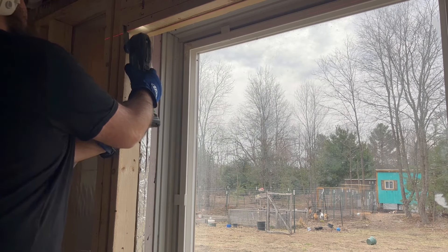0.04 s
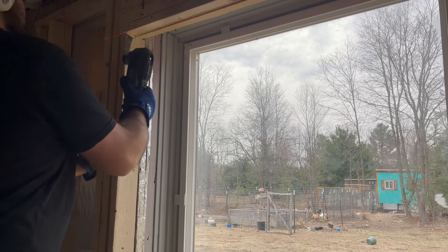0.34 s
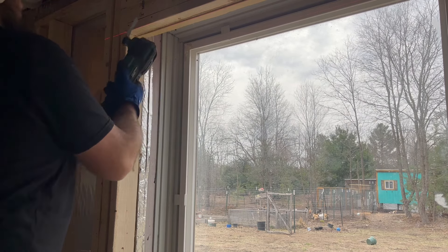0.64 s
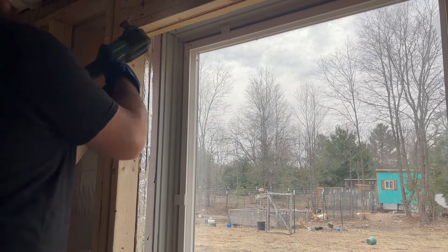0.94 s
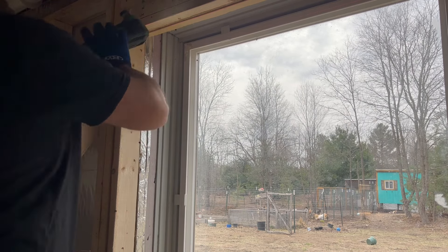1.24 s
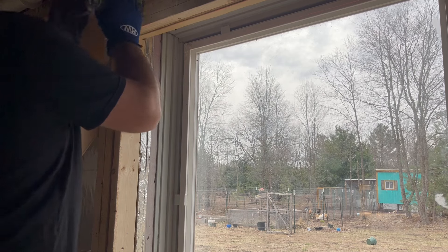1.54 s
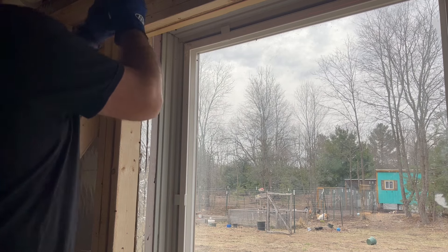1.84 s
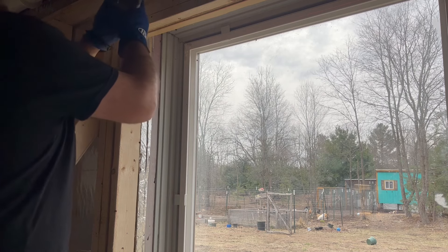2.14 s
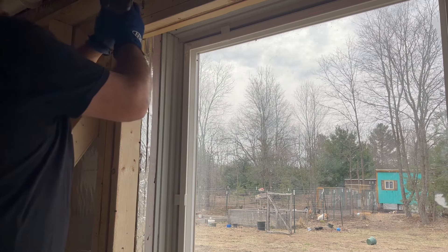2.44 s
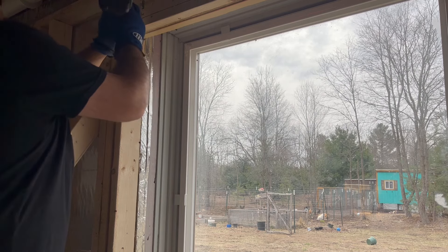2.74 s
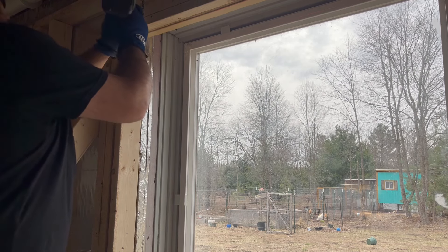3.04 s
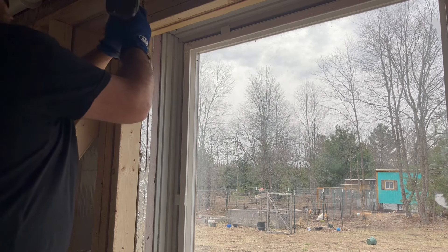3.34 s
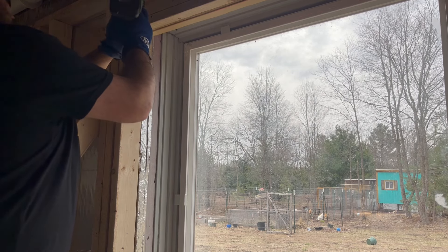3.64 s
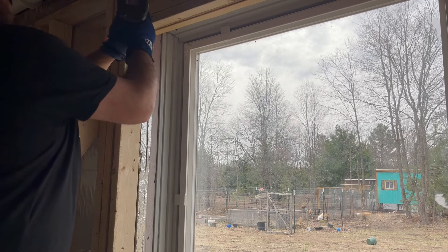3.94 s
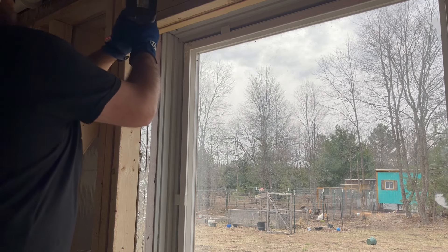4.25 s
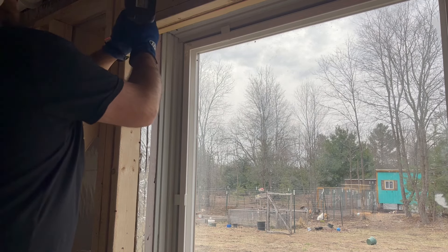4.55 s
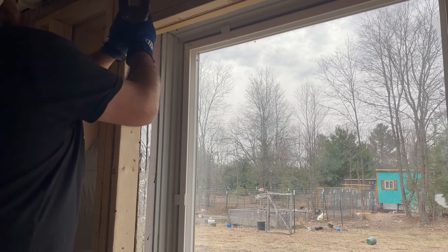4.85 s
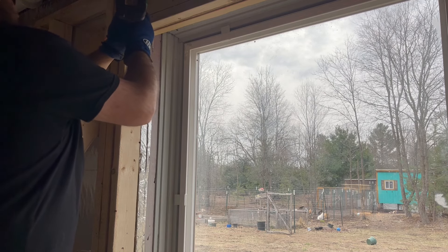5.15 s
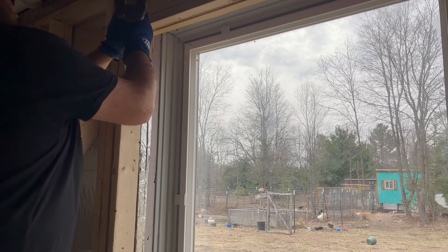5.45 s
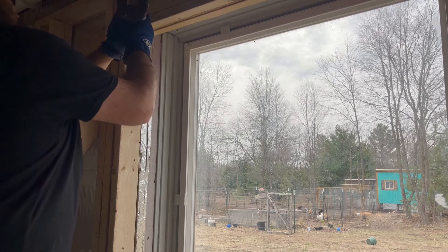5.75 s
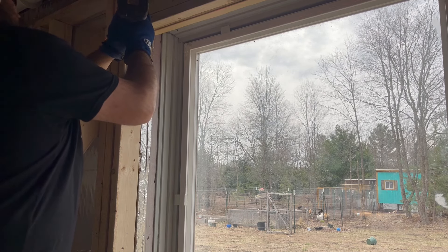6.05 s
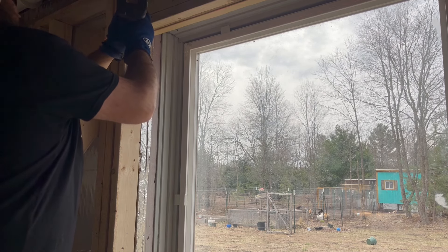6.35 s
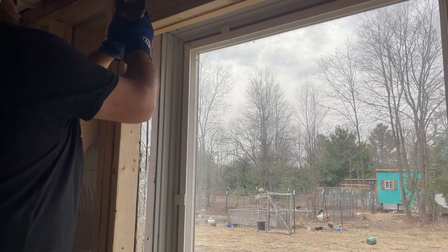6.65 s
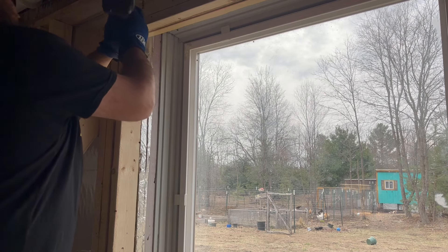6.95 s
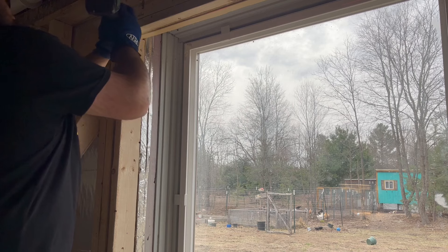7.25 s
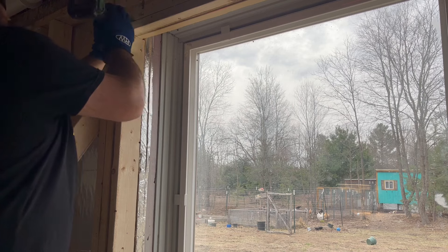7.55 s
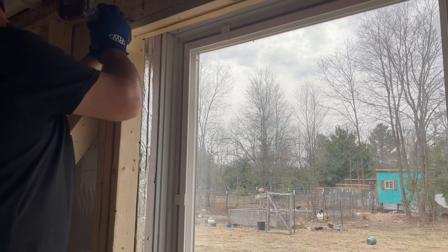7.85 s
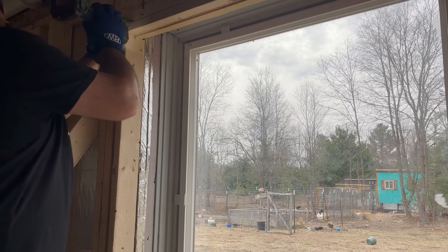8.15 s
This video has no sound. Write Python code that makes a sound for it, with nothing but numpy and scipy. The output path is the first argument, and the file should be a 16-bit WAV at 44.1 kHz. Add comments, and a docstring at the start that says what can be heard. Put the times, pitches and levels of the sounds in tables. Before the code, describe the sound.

A cordless oscillating tool buzzes steadily, then grows louder and raspier as its blade cuts into a wooden beam.

```python
"""An unfinished room, where a cordless oscillating tool works on a wooden beam overhead.
The blade swings about 300 times a second: after a brief bite it runs almost free, then cuts, then
wedges in the kerf. Its strokes kick housing, beam and blade into a harmonic buzz that roughens under
load. The teeth rasp, the blade rubs the kerf and now and then knocks on the timber, the timber frame
shudders, and the tool's fan hisses underneath."""
import sys
import numpy as np
from scipy import signal
from scipy.fft import rfft, irfft
from scipy.io import wavfile

SR = 44100
rng = np.random.default_rng(int(sys.argv[2]) if len(sys.argv) > 2 else 0)


def bounce(signal):
    """Save signal as a 16-bit WAV file at the path given by the first command-line argument."""
    frames = np.transpose(np.atleast_2d(signal))
    limited = np.clip(frames, -1, 1)
    pcm = np.round(limited * 32767).astype(np.int16)
    wavfile.write(sys.argv[1], SR, pcm)


N = 370440
TIME = np.arange(N) / SR
SLOW_TIME = np.linspace(0, N / SR, N // 60)   # control grid for the envelopes
STROKE_HZ = 301.3   # the rate that the governor aims at


# housing hum on harmonic 1, riding up and down as the tool turns in the hands: (time [s], level [dB])
HOUSING_HUM = [(0.0, -51), (0.04, -50), (0.16, -61), (0.18, -55), (1.26, -60), (1.38, -70), (1.4, -64.5),
               (1.73, -59), (3.86, -54), (4.16, -54.5), (4.23, -50), (4.37, -58), (4.6, -59), (4.77, -63),
               (4.84, -52.5), (6.15, -53.5), (6.2, -55), (6.36, -50), (6.53, -52), (7.27, -49.5),
               (7.34, -53.5), (7.95, -57), (8.05, -53), (8.09, -52), (8.14, -66), (8.16, -62), (8.19, -48),
               (8.24, -81), (8.26, -49), (8.28, -50), (8.4, -54)]
# low drone on harmonics 2 and 3: (time [s], level [dB])
LOW_DRONE = [(0, -52), (.15, -65.5), (.33, -76.5), (1.5, -72), (2.3, -63.5), (3.68, -61), (3.9, -68.5),
             (4.06, -50), (4.17, -49), (4.25, -67), (4.35, -50.5), (4.7, -56), (4.85, -59.5), (5.3, -62),
             (5.65, -50.5), (6.08, -53), (6.24, -44.5), (6.5, -49), (6.8, -47.5), (7.17, -49.5), (7.3, -59),
             (7.52, -58.5), (7.6, -49.5), (7.7, -56.5), (8.05, -57), (8.4, -50.5)]
# ring near 1.5 kHz on harmonic 5: (time [s], level [dB])
MID_RING = [(0.25, -73), (.8, -76), (1.45, -77), (2.05, -69.5), (3.9, -71.5), (4.13, -56), (4.2, -67),
            (4.33, -55), (4.72, -54), (4.77, -64.5), (5.86, -81), (5.95, -54), (6.02, -74), (6.09, -56),
            (6.27, -86), (6.33, -46), (6.42, -59), (6.55, -68), (6.62, -47), (6.75, -62), (6.84, -48),
            (6.97, -47), (7.06, -40.5), (7.14, -38.5), (7.2, -42), (7.27, -56), (7.37, -52.5), (7.68, -53),
            (7.76, -47.5), (7.92, -53.5), (7.99, -68), (8.15, -50.5), (8.24, -58), (8.31, -45),
            (8.4, -41.5)]
# base mix as the wood grips the blade: (grip [0 free, 1 cutting, 2 wedged], beam bark [dB],
# blade buzz [dB], blade sizzle [dB], teeth rasp [dB], kerf scrape [dB], frame shudder [dB])
GRIP_MIX = [(0, -68, -67.5, -64, -68.5, -71, -101), (.3, -69, -67.5, -69.5, -72, -69.5, -89),
            (.6, -60.5, -60.5, -64, -57.5, -56, -85), (1, -55, -52.5, -59, -53, -59, -72.5),
            (1.3, -49, -46, -53.5, -55, -52.5, -61), (2, -39.5, -44.5, -43, -36, -49, -90)]
# stereo image from the room's standing waves: (frequency [Hz], left over right [dB], left lead [rad])
STANDING_WAVES = [(301, 2, .1), (602, 4.3, .75), (904, 0, .9), (1205, -1, -.4), (1506, -.8, -1.85),
                  (1807, 1, .2), (2110, 2.5, .3), (4200, 2.5, .2), (6600, .5, 0), (15000, -.5, 0)]

def stroke_buzz(angle, grip, swell_db=1.15, top_trim_db=-.4, top_loss_db=5, scatter_rad=2.54):
    """Each stroke kicks housing, beam and blade: a stack of clean harmonics that roughen under load."""
    order = np.arange(1, 50)
    hz = order * STROKE_HZ
    gain = buzz_timbre(order, grip)
    pan_db, lead = read(STANDING_WAVES, hz)
    lead = lead + at_hz(PORT_LEAD, hz)
    hum, = read(HOUSING_HUM, SLOW_TIME)
    drone, = read(LOW_DRONE, SLOW_TIME)
    ring, = read(MID_RING, SLOW_TIME)
    bark, blade, sizzle = read(GRIP_MIX, grip)[:3]
    # the harder the grip, the more of the treble turns from tone into rasp
    top = rasp_level(grip) + top_trim_db - top_loss_db * grip
    bands = [([1], hum), ([2, 3], drone), ([4, 6], bark), ([5], ring),
             (range(7, 16), blade), (range(16, 26), sizzle), (range(26, 50), top)]
    for members, db in bands:
        band = np.isin(order, members)
        centre_power = np.sum((gain[band] * np.cos(lead[band, None] / 2)) ** 2, axis=0) / 2
        # each band rides its own fader and, under load, swells and drops a little
        fader = from_db(db + swell_db * np.minimum(grip, 1) * drift(8))
        gain[band] *= fader / np.sqrt(centre_power)
    gain = np.hypot(gain, np.sqrt(2) * singing_resonances(hz))
    # short waves feel every move of the hand, differently left and right
    sway_depth = np.interp(hz, [300, 1500, 3000, 8000], [.1, .13, .27, .17])
    # sticking teeth shake the harmonics, more so under drag
    chatter = .2 + .08 * np.minimum(grip, 1.3)
    # a wedged blade hammers: the phases close up into one sharp pulse per stroke
    spread = scatter_rad * np.interp(grip, [1.3, 2], [1, .4])
    out, turn, carrier = np.zeros((2, N)), np.exp(1j * angle), 1
    for n, level, pan, ahead, sway in zip(order, gain, pan_db, lead, sway_depth):
        carrier = carrier * turn   # up one harmonic
        height = min(n / 10, 1)
        voice = level * np.exp(1j * (spread * rng.standard_normal() + height * drift(.65)))
        voice *= 1 + np.sqrt(height) * chatter * (drift(22) + 1j * drift(7))
        image = from_db(pan / 2) * np.exp(.5j * ahead + sway * (drift(.35) + 1j * drift(2.9)))
        out += [(smooth(voice * image) * carrier).real, (smooth(voice / image) * carrier).real]
    return out


# balance within each band, a row per harmonic from 1 to 25: (free [dB], cutting [dB], wedged [dB])
HARMONIC_BALANCE = [(-57, -52, -52), (-51.5, -51.5, -55), (-55.5, -51.5, -63), (-62, -48, -42),
                    (-67, -50, -41), (-64.5, -48.5, -40.5), (-77, -63, -49), (-81, -57, -48),
                    (-80, -57.5, -53), (-66.5, -60, -57), (-80, -64.5, -49), (-66, -55.5, -67),
                    (-87, -60.5, -59), (-68, -63, -59.5), (-82, -62, -62), (-64, -68, -54),
                    (-73, -67.5, -53), (-80.5, -68, -67), (-80, -62.5, -60), (-63.5, -62.5, -44.5),
                    (-83, -57.5, -77), (-72.5, -72, -39), (-80, -63, -65), (-64, -61.5, -75),
                    (-75, -59, -60)]
# balance of the buzz's thin top: (frequency [Hz], free [dB], cutting [dB], wedged [dB])
TOP_BALANCE = [(8750, -103, -90, -79), (9070, -76, -52, -52), (9700, -88, -73, -70), (9400, -87, -56, -66),
               (9940, -84, -51, -84), (10770, -93, -59, -77), (11700, -86, -64, -49),
               (14580, -99, -62.5, -58), (14100, -92, -100, -59)]
# broad resonances that move with the point of contact: (time [s], wall [Hz], beam [Hz], blade [Hz])
FORMANTS = [(0, 845, 1530, 3300), (.45, 810, 1810, 4340), (2.1, 700, 1660, 3830), (2.6, 700, 1260, 3860),
            (3.299, 595.4, 1370, 3350), (4.05, 650, 1540, 2880), (4.45, 670, 1320, 3500),
            (4.7, 780, 1240, 3632), (5, 540, 1500, 3850), (5.5, 622, 1580, 3550), (5.75, 646, 1660, 2700),
            (6.4, 715, 1540, 2688), (6.85, 744, 1480, 3800), (7.199, 835, 1750, 3350),
            (7.55, 597, 1432, 3900), (8.4, 625, 1630, 3580)]

def buzz_timbre(order, grip, free_wander_db=7.5, judder_db=5):
    """Relative gain of each harmonic: set by the grip, shaken by the load, lifted by resonances."""
    hz = order * STROKE_HZ
    top_rows = np.transpose(read(TOP_BALANCE, hz[len(HARMONIC_BALANCE):]))
    db = np.array([np.interp(grip, [0, 1, 2], row) for row in np.vstack([HARMONIC_BALANCE, top_rows])])
    load = np.minimum(grip, 1)
    for n in order:
        wobble_db = free_wander_db * (1 - load) * drift(3) + judder_db * load * drift(9)
        db[n - 1] += min(n / 10, 1) * wobble_db
    bells = (9, 150), (7, 230), (3, 400)   # wall, beam, blade
    for centre, (lift_db, width_hz) in zip(read(FORMANTS, SLOW_TIME), bells):
        db += lift_db * np.exp(-.5 * ((hz[:, None] - centre) / width_hz) ** 2)
    return from_db(db)


# the governor holds when free, hunts under load, sags when wedged: (time [s], stroke rate [Hz])
STROKE_RATE = [(0, 301.5), (2.5, 301.6), (4.6, 301.3), (4.77, 302.2), (5.45, 300.4), (5.8, 301.2),
               (6.1, 301.4), (6.19, 299.8), (6.35, 302.3), (6.48, 300.6), (6.65, 302), (6.79, 300.1),
               (6.91, 302.1), (7.07, 300.4), (7.23, 302.3), (7.68, 301.7), (7.77, 300.3), (8.04, 302),
               (8.11, 297.3), (8.18, 297.6), (8.25, 303), (8.35, 299.4), (8.4, 300.5)]

def stroke_angle(grip, free_flutter=.00032, drag_flutter=.001334):
    """Phase of the blade's swing: it follows the motor, and drag makes it flutter."""
    rate, = read(STROKE_RATE, SLOW_TIME)
    flutter = (free_flutter + drag_flutter * grip ** 2) * drift(41.9)
    return 2 * np.pi * np.cumsum(smooth(rate * (1 + flutter))) / SR


# ringing accents in the buzz: (start [s], end [s], frequency [Hz], level [dB])
SINGING_CUES = [(0.232, .62, 3740, -72), (0.273, .44, 7200, -62), (0.373, 0.513, 4220, -65),
                (0.424, 0.777, 1750, -64.5), (.5, 1.3, 1180, -74), (.52, .75, 5125, -80),
                (0.726, 0.76, 602, -67), (0.764, 1.047, 5960, -65.5), (0.93, 0.946, 602, -63),
                (.78, 1.155, 3660, -69.5), (0.936, 1.26, 1808, -69), (.98, 1.2, 4730, -66),
                (1.226, 1.412, 870, -70.5), (1.25, 1.442, 5170, -70.5), (1.47, 2.25, 1750, -63.5),
                (1.72, 2.3, 910, -69), (1.602, 2.3, 6026, -73), (1.6, 2.302, 3315, -77.5),
                (1.6, 2.0, 3920, -73), (2.4, 2.714, 6120, -64.5), (2.572, 3.91, 3650, -69),
                (2.703, 3.5, 4200, -70), (3.5, 3.91, 7200, -64), (3.64, 3.674, 7260, -51),
                (4.026, 4.134, 2410, -59), (4.037, 4.24, 3010, -65), (4.27, 4.52, 1830, -56.5),
                (4.311, 4.537, 602, -58), (4.6, 4.748, 904, -58), (4.284, 4.55, 3730, -57),
                (4.61, 4.732, 1205, -52.5), (4.62, 4.733, 2190, -56.5), (4.76, 4.795, 1808, -57),
                (4.854, 4.975, 4060, -61.5), (4.874, 4.964, 1230, -58), (5.076, 5.131, 1808, -61),
                (5.544, 6.25, 5950, -66), (5.746, 6.132, 2570, -52), (6.289, 6.412, 1190, -54),
                (6.31, 6.436, 1790, -50.5), (6.303, 6.669, 2580, -54), (6.57, 6.847, 1760, -49.5),
                (6.622, 6.665, 7200, -47), (6.77, 6.917, 3510, -51), (6.838, 7.214, 4910, -57.5),
                (7.039, 7.217, 2610, -54), (7.079, 7.198, 4050, -51.5), (6.96, 7.205, 1960, -50),
                (7.435, 7.49, 2270, -55.5), (7.423, 7.607, 3640, -59), (7.64, 7.714, 2090, -57.5),
                (7.912, 7.943, 3580, -52), (7.915, 7.948, 1910, -51), (8.067, 8.167, 1880, -47),
                (8.124, 8.167, 1120, -43.5), (8.125, 8.168, 5930, -42), (8.258, 8.272, 1200, -38),
                (8.335, 8.45, 1230, -42), (8.27, 8.45, 1820, -40), (8.277, 8.45, 2110, -53),
                (8.299, 8.452, 3600, -48)]

def singing_resonances(hz, edge_s=.0023, width_hz=146, waver_db=1):
    """The blade holds a point of contact and a resonance sings out: gain for the nearest harmonics."""
    power = 0
    for start, end, centre, db in SINGING_CUES:
        attack = (1 + np.tanh((SLOW_TIME - start) / edge_s)) / 2
        release = (1 + np.tanh((end - SLOW_TIME) / edge_s)) / 2
        envelope = attack * release * from_db(db + waver_db * drift(7))
        near = np.exp(-((hz - centre) / width_hz) ** 2)
        power = power + np.outer(near / near.sum(), envelope ** 2)
    return np.sqrt(power)


# bright rasp of the teeth: (frequency [Hz], EQ [dB])
TEETH_EQ = [(400, -43), (900, -25), (2500, -1), (4000, 5), (5000, -29), (6000, 6), (6700, 2), (7300, 14.5),
            (8300, -32), (9200, -12), (9900, 12.5), (11000, -16), (12200, -7), (13600, -6), (15000, -28)]
# woody scrape of the kerf: (frequency [Hz], EQ [dB])
KERF_EQ = [(100, -26), (220, -19.5), (350, -7), (440, -16), (530, -3), (750, -0.5), (1000, -4.5),
           (1300, 6.5), (1700, 0), (2050, -3.5), (2500, -1.5), (3000, -8.5), (3700, -3.5), (6000, -6.5),
           (12000, -20)]
# the blade leans on the side of the kerf: (time [s], level [dB], half length [s])
SCRAPE_CUES = [(.04, -52, 0.053), (.108, -47.5, 0.025), (3.24, -63, .03), (3.44, -66, 0.031),
               (3.92, -54.5, 0.028), (4.12, -54.5, 0.043), (4.6, -57.5, .038), (4.79, -58, 0.028),
               (5.5, -59.5, 0.11), (5.68, -53, 0.04), (6.11, -52, 0.04), (6.93, -55, 0.032),
               (7.74, -60, 0.025), (7.945, -46, 0.022), (8.24, -46, 0.028)]

def cutting_friction(angle, grip, teeth_db=-2.5, kerf_db=1, free_db=-6, flicker_db=1.2, grain_db=1.1):
    """Teeth tear fibres and the blade rubs the kerf: grainy noise, pulsing lightly with each stroke."""
    rub = from_db(read(GRIP_MIX, grip)[4] + deepening(grip))
    scrape = np.hypot(rub, swells(SCRAPE_CUES)) * from_db(kerf_db + flicker_db * drift(30))
    looseness = np.maximum(1 - 2 * grip, 0)
    rasp = from_db(rasp_level(grip) + teeth_db + free_db * looseness)
    grain = smooth(from_db(grain_db * drift(60)))
    pulse = rms_one(np.exp(.061 * np.cos(angle)) * grain)
    # the teeth pass over the same fibres again, so part of the friction repeats
    teeth = smooth(rasp) * noise(TEETH_EQ, repeat=.27)
    kerf = smooth(scrape) * noise(KERF_EQ, repeat=.42)
    return pulse * (teeth + kerf)


# the teeth dig in and tear fibres: (time [s], level [dB], half length [s])
BITE_CUES = [(.042, -77, 0.033), (.132, -53, 0.011), (3.668, -55, .0051), (4.11, -45, 0.059),
             (4.69, -50.5, 0.064), (5.032, -54.5, .016), (6.39, -50, 0.062), (6.641, -44, 0.013),
             (7.515, -45, 0.0066), (8.146, -40.5, 0.046), (8.384, -33.5, 0.047)]

def rasp_level(grip):
    """Envelope of the teeth in dB: it follows the grip and flares at each bite."""
    steady_db = read(GRIP_MIX, grip)[3] + deepening(grip)
    return 20 * np.log10(np.hypot(from_db(steady_db), swells(BITE_CUES)))


def deepening(grip, db_per_s=.6, halfway_s=5.7):
    """Friction trim in dB: the deeper the kerf, the more the loaded blade rasps and rubs."""
    return np.minimum(grip, 1) * db_per_s * (SLOW_TIME - halfway_s)


# blade hits on wood: (time [s], level [dB], blade ring trim [dB], low thud trim [dB])
KNOCK_CUES = [(0.108, -61, 0, -7), (.15, -39.5, -7, 0.5), (3.224, -52, -5, -15), (4.814, -55, -10, 5),
              (5.024, -48.5, 0, -19), (7.506, -38.5, -15, -5), (7.515, -50, -11, 1), (7.528, -58, -19, 6),
              (7.924, -52, -10, -12)]
# body of a knock: (frequency [Hz], relative level [dB], t60 [s])
WOOD_MODES = [(220, -12, 0.22), (390, -8.5, 0.23), (526, -8, 0.2), (678, -3.5, 0.14), (990, -6, 0.16),
              (1298, 2.5, 0.087), (1358, -0.5, 0.075), (1833, 5.5, 0.041)]

def blade_knocks(attack_s=.0041, thud_below_hz=1100, blade_hz=7260, blade_t60=.16):
    """The blade strikes the timber: a short crack, the modes of wood and blade, and the room's tail."""
    rings, burst = np.zeros((2, N)), np.zeros(N)
    for time, db, blade_db, thud_db in KNOCK_CUES:
        start = int(time * SR)
        t = TIME[:min(SR // 2, N - start)]
        span = slice(start, start + len(t))
        blow = from_db(db) * (1 - np.exp(-t / attack_s))   # builds over a stroke or two
        crack = from_db(-3) * fade(t, t60=.12)
        tail = from_db(-12) * fade(t, t60=.32)
        burst[span] += blow * (crack + tail)
        for hz, mode_db, t60 in WOOD_MODES + [(blade_hz, 1.5 + blade_db, blade_t60)]:
            phase = rng.uniform(0, 2 * np.pi) + rng.normal(0, .64, (2, 1))
            envelope = blow * from_db(mode_db + thud_db * (hz < thud_below_hz)) * fade(t, t60)
            rings[:, span] += envelope * np.sin(2 * np.pi * hz * t + phase)
    return rings + burst * noise(KERF_EQ)


# jolts to the timber frame: (time [s], level [dB])
JOLT_CUES = [(.175, -51.5), (1.33, -76), (3.45, -73), (4.2, -61), (4.81, -73), (5.66, -58), (6.32, -78),
             (7.52, -53)]
# low-mid weight of the frame: (frequency [Hz], EQ [dB])
FRAME_EQ = [(20, -42), (35, -25), (55, -14), (120, -4), (185, 3), (240, -4.5), (450, 4.5), (900, -10)]

def frame_shudder(grip, rise_s=.011, t60=.47, trim_db=1):
    """The timber frame trembles under load; each jolt sets off a shudder that dies away."""
    tremble = from_db(read(GRIP_MIX, grip)[5])
    jolts = 0
    for time, db in JOLT_CUES:
        age = SLOW_TIME - time
        jolts += from_db(db) * np.exp(np.minimum(age, 0) / rise_s) * fade(np.maximum(age, 0), t60)
    return smooth(np.hypot(tremble, jolts) * from_db(trim_db)) * noise(FRAME_EQ)


# short, low growls: (time [s], level [dB], half length [s])
GROWL_CUES = [(3.445, -101, 0.026), (4.21, -68.5, 0.044), (5.367, -77, 0.051)]

def skipping_growl(angle):
    """The blade catches on every other stroke and sounds an octave below the buzz."""
    return smooth(swells(GROWL_CUES)) * np.sin(angle / 2)


# fader of the whine: (time [s], level [dB])
WHINE_LEVEL = [(.25, -100), (.36, -72), (.9, -72), (1.3, -96), (1.65, -67), (1.95, -67), (2.1, -88)]

def faint_whine(angle):
    """A thin tone between harmonics 4 and 5, strongest while the blade runs free."""
    db, = read(WHINE_LEVEL, TIME)
    return from_db(db) * np.sin(4.5 * angle)


# airy bed of the fan: (frequency [Hz], EQ [dB])
FAN_EQ = [(25, -47), (60, 0.5), (200, -7.5), (430, -21), (750, 3.5), (1300, 7), (2000, 5), (2800, -0.5),
          (4200, 6.5), (7300, 4), (10000, 9.5), (12500, -4.5), (15500, -28)]

def fan_hiss(level_db=-60.5):
    """The fan moves air with a steady hiss."""
    return from_db(level_db) * noise(FAN_EQ)


# stereo width of the noise: (frequency [Hz], left-right likeness [0 wide, 1 mono])
STEREO_LIKENESS = [(60, 0.97), (300, 0.46), (700, 0.1), (1400, 0.065), (2000, 0.71), (5000, 0.021),
                   (8000, 1), (15000, 0.95)]
# phase between the left and right microphone ports: (frequency [Hz], left lead [rad])
PORT_LEAD = [(30, 0), (4900, .1), (5800, -1.3), (7200, -2), (8300, -3.1), (10000, -4.6), (11300, -6.2),
             (12800, -6.4), (14000, -8.0), (15000, -9.4)]

def noise(eq, repeat=0):
    """Stereo noise of rms 1, shaped by an EQ; the share `repeat` feeds back one stroke later."""
    hz = np.arange(N // 2 + 1) * SR / N
    mid, side = rfft(rng.standard_normal((2, N)))
    alike, sides = at_hz(STEREO_LIKENESS, hz), np.array([[1], [-1]])
    pair = np.sqrt(1 + alike) * mid + sides * np.sqrt(1 - alike) * side
    pair /= 1 - repeat * np.exp(-2j * np.pi * hz / STROKE_HZ)
    lead = np.exp(.5j * sides * at_hz(PORT_LEAD, hz))
    return rms_one(irfft(pair * from_db(at_hz(eq, hz)) * lead, N))


def drift(rate_hz):
    """Smooth random modulation of rms 1 on the control grid."""
    pole = np.exp(-2 * np.pi * rate_hz * SLOW_TIME[1])
    white = rng.standard_normal(2 * len(SLOW_TIME))
    return rms_one(signal.lfilter([1], [1, -2 * pole, pole * pole], white)[len(SLOW_TIME):])


def swells(cues):
    """Gain envelope with one bell-shaped swell per cue."""
    return sum(from_db(db) * np.exp(-.5 * ((SLOW_TIME - time) / half) ** 2) for time, db, half in cues)


def fade(t, t60):
    """Decay by 60 dB in t60 seconds."""
    return from_db(-60 * t / t60)


def smooth(slow):
    """From the control grid to every sample."""
    return np.interp(TIME, SLOW_TIME, slow)


def read(rows, at):
    """A table's later columns, interpolated along its first."""
    first, *columns = np.transpose(rows)
    return [np.interp(at, first, column) for column in columns]


def at_hz(points, hz):
    """A curve read on a log-frequency axis."""
    freqs, values = np.transpose(points)
    return np.interp(np.log(hz + 1), np.log(freqs), values)


def from_db(db):
    """Decibels to gain."""
    return 10 ** (np.asarray(db) / 20)


def rms_one(x):
    """Scale to unit power."""
    return x / np.sqrt(np.mean(x ** 2) + 1e-20)


# the master gesture, how the blade sits in the wood: (time [s], grip [0 free, 1 cutting, 2 wedged])
BLADE_GRIP = [(0, 1.04), (.13, 0.27), (.27, 0.015), (2, .044), (2.45, 0.23), (3.5, 0.43), (3.96, 0.58),
              (4.07, 0.8), (4.17, 0.75), (4.25, 0.72), (4.35, 0.76), (4.68, 0.97), (4.85, 0.61),
              (5.2, 0.49), (5.55, 0.79), (5.8, 0.92), (6.15, 1.08), (6.24, 1.1), (6.33, 1.18), (6.45, 1.06),
              (6.51, 1), (6.6, 1.04), (6.85, 1.17), (6.96, 1.11), (7.18, 1.15), (7.25, 1.04), (7.33, 0.73),
              (7.93, 0.73), (8.04, 0.63), (8.075, 1.06), (8.105, 1.1), (8.13, 2.1), (8.16, 2.02),
              (8.18, 1.03), (8.245, 1.5), (8.29, 1.79), (8.4, 1.95)]

def scene(noise_pan_db=1):
    """The tool's tones over its noise layers, which sit a little to the left."""
    grip, = read(BLADE_GRIP, SLOW_TIME)
    angle = stroke_angle(grip)
    noises = cutting_friction(angle, grip) + frame_shudder(grip) + blade_knocks() + fan_hiss()
    tones = stroke_buzz(angle, grip) + skipping_growl(angle) + faint_whine(angle)
    return tones + noises * from_db([[noise_pan_db], [-noise_pan_db]])


def record(dry, cutoff_hz=15000):
    """A steep high cut on the whole mix."""
    return signal.sosfilt(signal.ellip(10, .2, 70, cutoff_hz, fs=SR, output="sos"), dry)


dry = scene()
out = record(dry)
bounce(out)
```